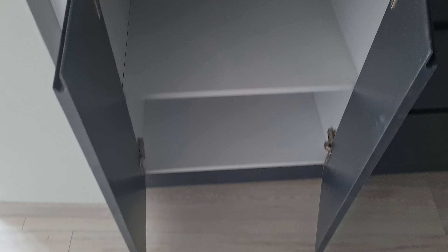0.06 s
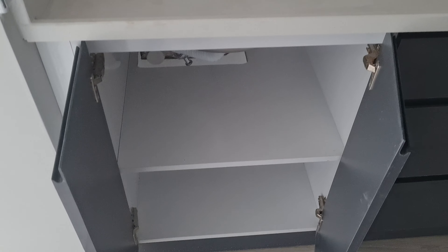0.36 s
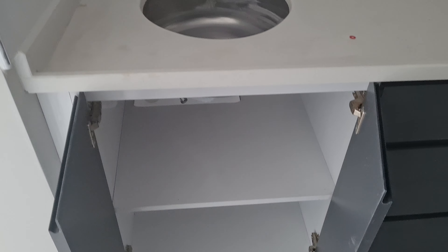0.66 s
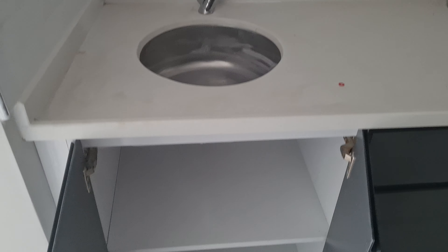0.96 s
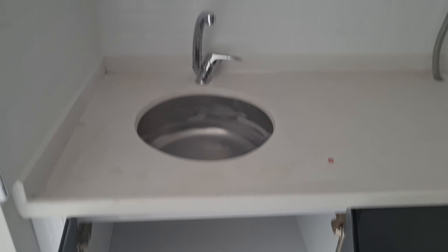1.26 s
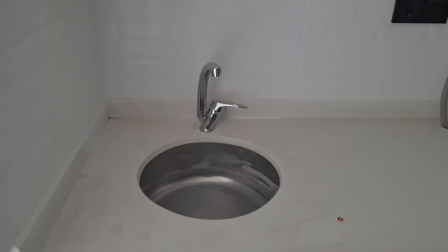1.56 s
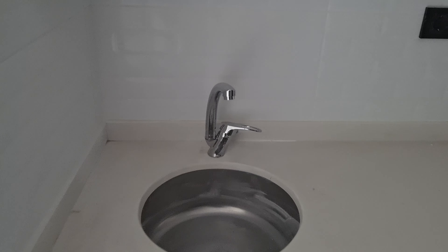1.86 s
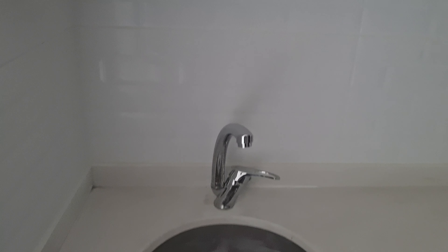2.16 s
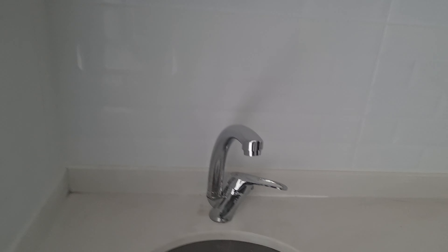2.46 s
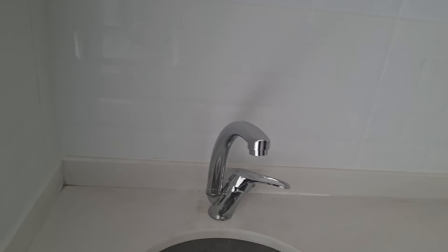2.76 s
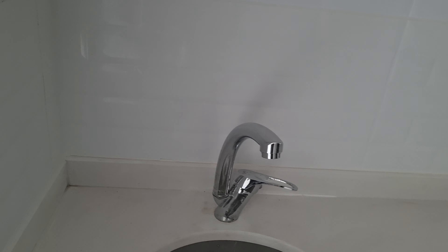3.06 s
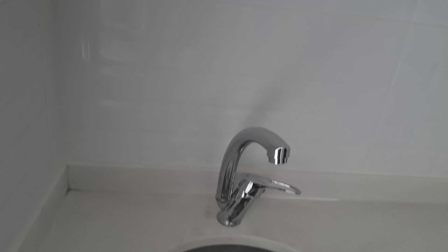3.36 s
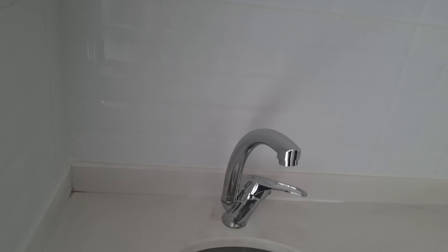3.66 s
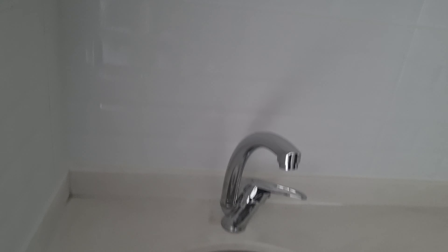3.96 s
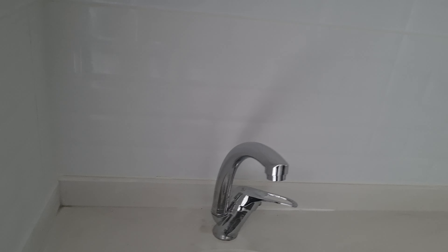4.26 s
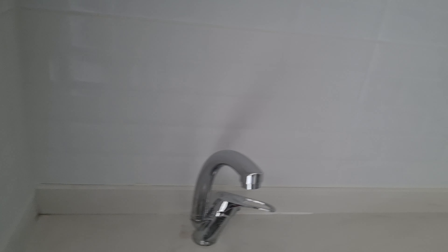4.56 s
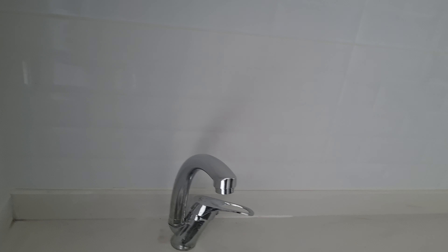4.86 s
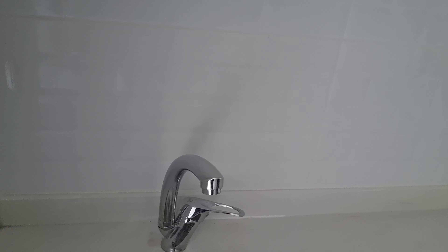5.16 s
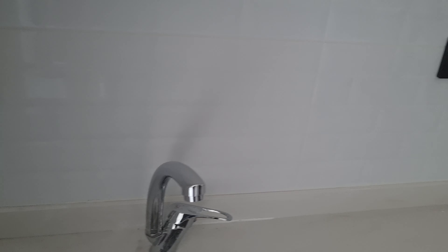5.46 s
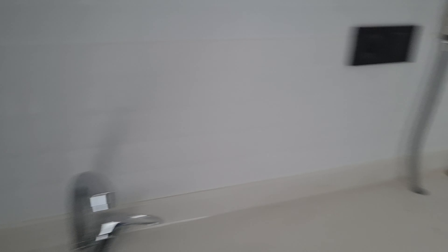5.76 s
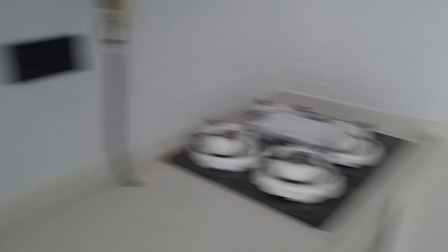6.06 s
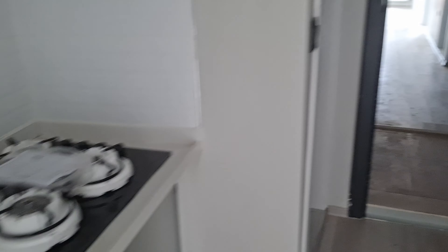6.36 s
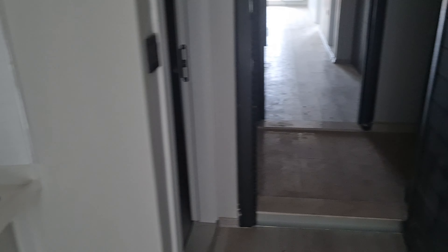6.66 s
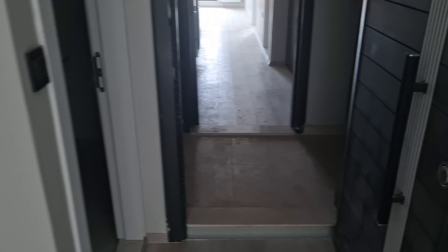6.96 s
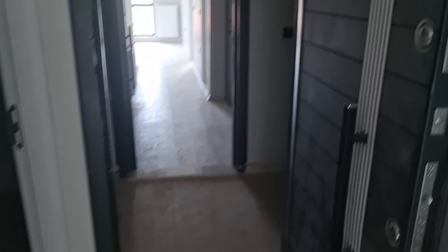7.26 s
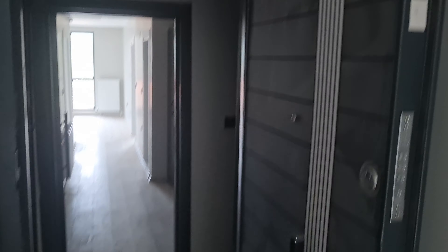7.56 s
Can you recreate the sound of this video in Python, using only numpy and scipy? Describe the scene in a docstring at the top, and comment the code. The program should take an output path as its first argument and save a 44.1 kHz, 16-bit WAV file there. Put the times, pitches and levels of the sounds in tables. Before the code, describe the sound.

In a bare, echoing kitchen, a cupboard door is nudged and then closes with a deep wooden thud. After two light knocks, the second door shuts with a sharper bang that rings around the room. Before this, a few close finger taps bump the hand-held microphone on the right. Clothing rustles quietly, soft footsteps come at the end, and distant traffic rumbles faintly behind the windows.

```python
"""In an empty, tiled kitchen, the two doors of a sink cabinet are pushed shut: a nudge, a heavy thud,
then a hard bang. Each hit sets a wooden panel booming, and the bare room rings on.
Fingers tick on a hand-held microphone and a sleeve rustles; at the end the person turns and steps away.
Faint traffic comes through the windows, and a far motor hums briefly at the start."""
import sys
import numpy as np
from scipy import signal
from scipy.fft import rfft, irfft, next_fast_len
from scipy.io import wavfile

SR = 44100
rng = np.random.default_rng(int(sys.argv[2]) if len(sys.argv) > 2 else 0)


def log_audio(samples):
    """Write samples as a 16-bit WAV file to the path given in sys.argv[1]."""
    # one column per channel
    frames = np.atleast_2d(samples).T
    # limit to full scale, then quantise
    limited = np.clip(frames, -1, 1)
    pcm = np.round(limited * 32767).astype(np.int16)
    wavfile.write(sys.argv[1], SR, pcm)


N = 336042

# how alike the two ears hear each pitch: pitch_hz, likeness (1 the same, 0 unrelated)
LIKENESS = [(30, 0.17), (70, 0.85), (180, 0.98), (300, 0.78), (550, 0.54), (1000, -0.079), (2000, -0.026),
            (4000, 0.067), (16000, -0.065)]
BAND_EDGES_HZ = np.geomspace(24, 17500, 29)
BANDS_HZ = np.sqrt(BAND_EDGES_HZ[:-1] * BAND_EDGES_HZ[1:])   # the middle of each band
RING_S = np.arange(int(1.3 * SR)) / SR   # time since a hit


def doors():
    """One door closes with a dull boom, the other with a harder bang."""
    # each time a door hits: start_s, thump_db, clack_db, hardness_hz, door (0 or 1)
    hits = [(2.404, -26, -18, 7000, 0), (2.421, -16.5, -17.5, 5500, 0), (2.483, -42, -33, 1500, 0),
            (2.886, -28.5, -46, 700, 0), (3.772, -12, -10.5, 2700, 0), (3.789, -9.5, -8.5, 2140, 0),
            (3.796, -2, -7, 1500, 0), (3.807, -3, -4, 900, 0), (4.284, -28.5, -27, 1210, 0),
            (4.706, -27.5, -28, 2980, 0), (4.716, -33.5, -28, 2980, 1), (5.55, -4, 0.5, 5950, 1),
            (5.558, -11, -9, 4000, 1), (5.574, -4.5, -18, 2000, 1)]
    # the strong tones (modes) of each panel: pitch_hz, level_db, ring_s
    dull_tones = [(75, -26.5, 0.44), (100, -20, 0.18), (114.2, -3, 0.27), (120.7, -10.5, 0.92),
                  (141.8, -16, 0.72), (190.3, -13.5, 0.79), (206, 1, 0.51), (220.8, -13, 1), (244, -21, 1),
                  (269.4, -11.5, 0.8), (284.6, -15.5, 0.76), (333.5, -23.5, 1), (365.7, -15.5, 0.75),
                  (376.6, -16, 0.62), (476, -18, 0.61), (615, -10, 0.2), (706, -3, 0.12), (818, -19, 0.5),
                  (971, -17, 0.33), (1300, -7.5, 0.15)]
    hard_tones = [(54, -4, 0.54), (121, -4, 0.47), (142.5, -2, 0.46), (163.7, 7.5, 0.2), (215.8, -8, 0.83),
                  (275, -8, 0.72), (303.6, -1.5, 0.48), (330, -6.5, 0.95), (344, -12, 0.99),
                  (352.7, -1.5, 0.74), (468.3, -12, 0.96), (542.5, -14, 0.63), (583, -11, 0.53),
                  (765, -17, 0.43), (955, -1, 0.15), (1047, -14.5, 0.47), (1102, -14, 1.0),
                  (1121, -5, 0.33), (1393, -4.5, 0.21), (1453, -19, 0.79), (1554, -19, 1), (1628, -17.5, 1),
                  (1720, -3.5, 0.18), (2023, -20, 0.61), (2280, -16, 0.81)]
    # each panel's crowd of weak tones, heard as noise: pitch_hz, level_db
    dull_crowd = [(30, -20), (60, -7.5), (110, -1.5), (220, -5), (400, -7), (750, -12.5), (1000, -10),
                  (1350, -11), (2300, -17.5), (3500, -24), (6000, -27.5), (8500, -29), (12000, -25),
                  (16000, -33.5)]
    hard_crowd = [(30, -4), (55, -22), (140, 0.5), (330, -11.5), (430, -11), (1000, -11.5), (1220, -11),
                  (1700, -11), (2600, -18), (3700, -23.5), (5200, -37), (7000, -98), (9000, -70),
                  (16000, -83)]
    dull_hits, hard_hits = ([row[:-1] for row in hits if round(row[-1]) == door] for door in range(2))
    dull = door_panel(dull_hits, dull_tones, dull_crowd,
                      tones_db=-19.5, crowd_db=0.5, room_db=-14.0, crack_db=17.5, build_s=0.0038)
    hard = door_panel(hard_hits, hard_tones, hard_crowd,
                      tones_db=-22.5, crowd_db=0, room_db=-9, crack_db=19.5, build_s=0.0012)
    return (dull + hard) * pan(db=-0.2)


def door_panel(hits, tones, crowd, tones_db, crowd_db, room_db, crack_db, build_s):
    """Each hit gives a crack, strong tones, and a wash of weak ones that rings on in the room."""
    # how long the wood and the bare kitchen ring: pitch_hz, ring_s
    wood_ring = [(50, 0.73), (200, 0.33), (800, 0.19), (2500, 0.29), (10000, 0.2)]
    room_ring = [(50, 2.37), (150, 1.1), (350, 1.3), (900, 1.226), (2400, 1.625), (5000, 1.53),
                 (12000, 0.44)]
    out, size = np.zeros((2, N)), len(RING_S)
    noise = noise_bands(size + SR // 2)
    colour = from_db(crowd_db + at_hz(crowd, BANDS_HZ))
    wood = decay(at_hz(wood_ring, BANDS_HZ)[:, None])
    room = from_db(room_db) * decay(at_hz(room_ring, BANDS_HZ)[:, None])
    build = 1 - np.exp(-RING_S / build_s)   # waves take a moment to fill the panel
    fade = np.hypot(wood, room) * build
    click = from_db(crack_db) * signal.unit_impulse(SR // 10)
    crack = np.array([(-1) ** k * cut(click, BAND_EDGES_HZ[k:k + 2], "band")
                      for k in range(len(BANDS_HZ))])
    hz, db, ring_s = np.transpose(tones)
    cycles = np.outer(hz, RING_S)
    rings = decay(ring_s[:, None]) * (1 - np.exp(-cycles)) * np.exp(2j * np.pi * cycles)
    # higher tones reach the two ears out of step
    skew = np.arccos(at_hz(LIKENESS, hz)) * rng.choice([-.5, .5], len(hz))
    phase = rng.uniform(0, 2 * np.pi, len(hz)) + np.array([skew, -skew])
    for start_s, *contact in hits:
        band_gains = colour * hit_force(BANDS_HZ, *contact)
        offset = rng.integers(SR // 2)   # every hit stirs the crowd anew
        wash = np.einsum("k,kt,kct->ct", band_gains, fade, noise[..., offset:offset + size])
        in_step = np.exp(1j * (phase + 2 * np.pi * hz * start_s))   # feeds the swing already there
        swing = from_db(tones_db + db) * hit_force(hz, *contact) * in_step
        add(out, start_s, wash + (swing @ rings).imag)
        add(out, start_s, band_gains @ crack)
    return out


def hit_force(hz, thump_db, clack_db, hardness_hz, split_hz=520):
    """Force at each pitch: the flat of the door thumps, its edge clacks, a soft touch loses treble."""
    low_share = 1 / (1 + (hz / split_hz) ** 6)
    power = from_db(thump_db) ** 2 * low_share + from_db(clack_db) ** 2 * (1 - low_share)
    return np.sqrt(power / (1 + (hz / hardness_hz) ** 2))


def thuds(rise_cycles, roughness):
    """A soft weight sets one tone swinging, blurred by the pitches around it."""
    # dull knocks, footsteps, and the soft swell of air pushed ahead of a closing door (206 Hz rows): start_s,
    # level_db, pitch_hz, ring_s
    knocks = [(1.834, -47.5, 620, 0.048), (2.368, -46.5, 206, 0.64), (2.42, -26, 121, 0.21),
              (2.945, -43, 135, 0.23), (3.742, -45, 206, 0.34), (4.287, -27, 108.6, 0.36),
              (4.452, -33.5, 131, 0.095), (5.565, -15.5, 140.2, 0.21), (6.974, -32.5, 69.5, 0.14),
              (7.39, -44.5, 135, 0.4), (7.509, -41, 75, 0.4)]
    out = np.zeros(N)
    for start_s, db, hz, ring_s in knocks:
        blur = cut(rng.standard_normal(len(RING_S)), [hz / 2, hz * 2], "band")
        swing = np.sin(2 * np.pi * hz * RING_S) + roughness * blur / blur.std()
        rise = 1 - np.exp(-RING_S * hz / rise_cycles)
        add(out, start_s, from_db(db) * swing * decay(ring_s) * rise)
    return out


def fingers(case_hz, case_q, bump_db, bump_hz, knock_db, knock_hz, ping_hz, ping_s, left_db):
    """A touch shakes the microphone's hollow case and puffs air into its right opening, which pings."""
    # finger taps: start_s, level_db, hardness_hz, ping_db (relative to the tap)
    taps = [(0.3886, -36.5, 9000, 12), (0.3889, -13, 1470, -44), (0.3997, -13.5, 880, -48),
            (1.0430, 0.5, 3400, -20), (1.0624, 2, 520, -62), (1.0713, -2, 454, -51), (1.128, -17, 700, -26),
            (1.145, -22, 500, -34), (1.153, -0.5, 334, -48)]
    # a finger slides past the opening: peak_s, rise_s, fall_s, level_db
    slides = [(1.148, 0.028, 0.033, -43), (1.217, 0.019, 0.016, -46.5)]
    # the hiss of that slide: pitch_hz, level_db
    slide_colour = [(100, 0), (300, 9), (1200, -7.5), (3000, -16), (6500, -14.5), (9000, -22.5),
                    (12500, -18), (16000, -25.5)]
    out, t = np.zeros(N), RING_S[:SR // 10]
    omega = 2 * np.pi * case_hz
    case = signal.bilinear([1, 0, 0], [1, omega / case_q, omega ** 2], SR)   # acts as a damped spring
    ping = np.sin(2 * np.pi * ping_hz * t) * decay(ping_s)[:len(t)]
    for start_s, db, hardness_hz, ping_db in taps:
        push = t ** 3 * np.exp(-4 * np.pi * hardness_hz * t) + 1e-40
        push = -2 * push / push.sum()
        swing = signal.lfilter(*case, push)
        bump = from_db(bump_db) * cut(push, [bump_hz / 2, bump_hz * 2], "band", order=1)
        knock = from_db(knock_db) * cut(push, [knock_hz / 2 ** .5, knock_hz * 2 ** .5], "band", order=1)
        add(out, start_s, from_db(db) * (swing - bump + knock + from_db(ping_db) * ping))
    out += swells(slides) * rustle(slide_colour, flicker_db=2, flicker_hz=200)[1]
    return out * np.array([[from_db(left_db)], [1]])


def person(stir_db):
    """Sleeve, grip and feet rub as the person reaches down and turns."""
    # arm movements: peak_s, rise_s, fall_s, sleeve_db, grip_db
    reaches = [(.41, 0.023, 0.12, -69.5, -79), (1.57, 0.05, .09, -95, -76), (1.92, 0.069, .12, -87, -69),
               (2.15, 0.28, 0.12, -57.5, -72.5), (2.42, 0.12, 0.19, -58, -70),
               (2.78, 0.1, 0.31, -59.5, -65), (3.2, 0.45, .32, -57.5, -66), (3.285, 0.049, 0.05, -51, -75),
               (4.15, 0.27, 0.055, -54.5, -58), (4.29, 0.069, 0.19, -54, -60),
               (4.68, 0.29, 0.2, -59.5, -62.5), (5.27, 0.11, 0.24, -77, -69.5),
               (5.5, 0.076, .15, -60.5, -66.5), (5.9, 0.092, 0.15, -57, -58.5),
               (6.25, 0.26, 0.16, -56, -58), (6.66, 0.24, 0.16, -64.5, -75.5),
               (7.14, 0.014, 0.055, -55.5, -86), (7.194, 0.027, .03, -53.5, -61),
               (7.33, 0.13, 0.32, -52, -63)]
    # clothes and feet shuffle as the weight shifts: peak_s, rise_s, fall_s, level_db
    shuffles = [(2.8, 0.22, 0.62, -61.5), (6.35, 0.13, 0.26, -54), (6.95, 0.22, 0.12, -55.5),
                (7.42, 0.51, 0.31, -52.5), (7.364, .008, .015, -45.5)]
    # the sleeve's rustle, the grip's fine hiss and the low shuffle: pitch_hz, level_db
    sleeve_colour = [(200, -3), (460, 11), (700, -1), (1100, 6.5), (1700, 1), (2050, 5.5), (2500, -1.5),
                     (3600, -1.5), (4500, 1.5), (6500, -5.5), (8300, -17.5), (9800, -9.5), (11500, -15),
                     (16000, -39)]
    grip_colour = [(1000, -3.5), (5000, -1), (7000, 4.5), (8400, -4.5), (10000, -1.5), (12500, 2.5),
                   (16000, -2)]
    shuffle_colour = [(30, -10), (80, 3), (150, -2.5), (270, 2.5), (450, -10.5), (1000, -9), (2000, -17.5),
                      (4000, -35.5), (16000, -46)]
    sleeve_gain = swells([(*timing, db) for *timing, db, _ in reaches])
    grip_gain = swells([(*timing, db) for *timing, _, db in reaches])
    shuffle_gain = np.hypot(swells(shuffles), from_db(stir_db))   # clothes never lie quite still
    sleeve = sleeve_gain * rustle(sleeve_colour, flicker_db=0.77, flicker_hz=62.7)
    grip = grip_gain * rustle(grip_colour, flicker_db=1.5, flicker_hz=150)
    shuffle = shuffle_gain * rustle(shuffle_colour, flicker_db=1.5, flicker_hz=25)
    return (sleeve + grip) * pan(db=-0.5) + shuffle * pan(db=-3.0)


def town(motor_hz, motor_db, stop_s, fade_s):
    """Far traffic rumbles through the windows; a motor hums, then fades away."""
    # how loud the traffic is: time_s, level_db
    traffic_levels = [(0, -61), (.6, -61), (1.1, -61.5), (1.6, -68), (2.2, -64), (5, -63), (7.62, -59)]
    # its dull rumble: pitch_hz, level_db
    traffic_colour = [(25, -10), (70, -5), (130, -5.5), (220, 1.5), (300, 1.5), (500, -8), (950, -3.5),
                      (1400, -15.5), (2000, -20.5), (2800, -33), (4600, -21.5), (8000, -34), (12000, -40),
                      (16000, -34)]
    t = np.arange(N) / SR
    traffic_gain = from_db(np.interp(t, *np.transpose(traffic_levels)))
    traffic = traffic_gain * rustle(traffic_colour, flicker_db=2.1, flicker_hz=6)
    motor_gain = from_db(motor_db - 60 * np.maximum(t - stop_s, 0) / fade_s)
    return traffic + motor_gain * np.sqrt(2) * np.sin(2 * np.pi * motor_hz * t)


def swells(moves, roundness=1.6):
    """Loudness of rubbing: each movement speeds up to its peak, then slows again."""
    t, power = np.arange(N) / SR, np.zeros(N)
    for peak_s, rise_s, fall_s, db in moves:
        away = np.maximum((peak_s - t) / rise_s, (t - peak_s) / fall_s)
        near = away < 10
        power[near] += (from_db(db) * np.exp(-away[near] ** roundness)) ** 2
    return np.sqrt(power)


def rustle(colour, flicker_db, flicker_hz):
    """Stereo noise whose level flickers; colour says how strong each pitch is."""
    size = next_fast_len(N)
    hz = np.maximum(np.fft.rfftfreq(size, 1 / SR), 1)
    white = rfft(rng.standard_normal((2, size)))
    mid, side = white * from_db(at_hz(colour, hz)) * (hz > BAND_EDGES_HZ[0])
    noise = irfft(two_ears(mid, side, hz), size)[:, :N]
    flicker = cut(rng.standard_normal(N), flicker_hz, "low")
    noise *= from_db(flicker_db * flicker / flicker.std())
    return noise / noise.std()


def noise_bands(size):
    """Stereo noise split into bands a third of an octave wide: bands x ears x samples."""
    white, bands = rng.standard_normal((2, 2, size + 8000)), []
    for k, hz in enumerate(BANDS_HZ):
        mid, side = cut(white[k % 2], BAND_EDGES_HZ[k:k + 2], "band")[:, -size:]
        bands.append(two_ears(mid, side, hz))
    return np.array(bands)


def two_ears(mid, side, hz):
    """Blend two noises into left and right, alike only at low pitches."""
    alike = at_hz(LIKENESS, hz)
    return np.sqrt(1 + alike) * mid + np.sqrt(1 - alike) * side * [[1], [-1]]


def from_db(db):
    """Turn decibels into a gain."""
    return np.exp(np.asarray(db) * (np.log(10) / 20))


def at_hz(table, hz):
    """Read a table at any pitch, sliding between its rows."""
    pitches, values = np.transpose(table)
    return np.interp(np.log(hz), np.log(pitches), values)


def cut(sound, hz, kind, order=2):
    """Keep only the lows, or one band, of a sound."""
    sections = signal.butter(order, np.clip(hz, 10, .45 * SR), kind, fs=SR, output="sos")
    return signal.sosfilt(sections, sound + 1e-18)


def decay(ring_s):
    """A fade that falls 60 dB in ring_s."""
    return from_db(-60 * RING_S / ring_s)


def pan(db):
    """Left and right gains; below 0 dB the sound leans right."""
    return from_db(np.array([[db], [-db]]) / 2)


def add(track, start_s, sound):
    """Mix a sound into the track."""
    i = round(start_s * SR)
    track[..., i:i + sound.shape[-1]] += sound[..., :N - i]


def scene():
    """Doors and thuds, the person's small noises and the town outside."""
    ticks = fingers(case_hz=291, case_q=3.0, bump_db=1.5, bump_hz=135, knock_db=2.0, knock_hz=960,
                    ping_hz=12300, ping_s=0.0016, left_db=-26)
    rubbing = person(stir_db=-72.5)
    bangs = doors() + thuds(rise_cycles=1.0, roughness=0.29)
    outside = town(motor_hz=70.5, motor_db=-62.5, stop_s=0.38, fade_s=0.66)
    return bangs + ticks + rubbing + outside


def record(dry):
    """The highest treble is cut off steeply."""
    cutoff_hz = 15850
    return signal.sosfilt(signal.ellip(10, .1, 80, cutoff_hz, fs=SR, output="sos"), dry)


dry = scene()
out = record(dry)
log_audio(out)
```